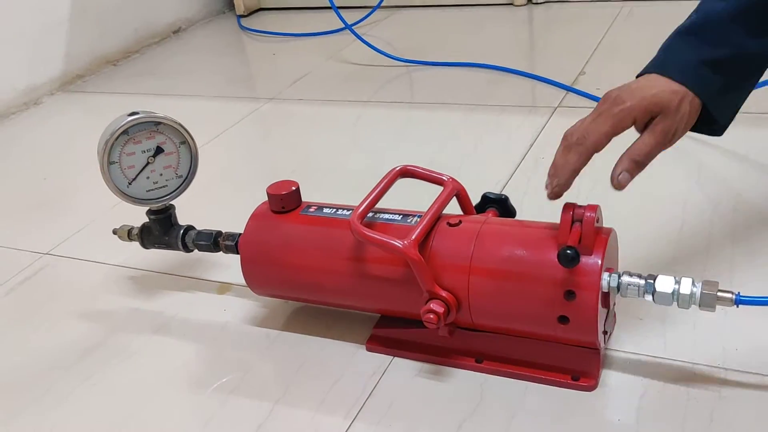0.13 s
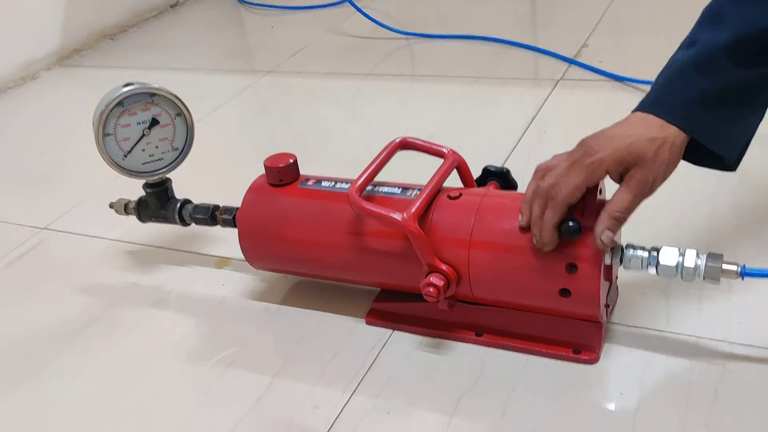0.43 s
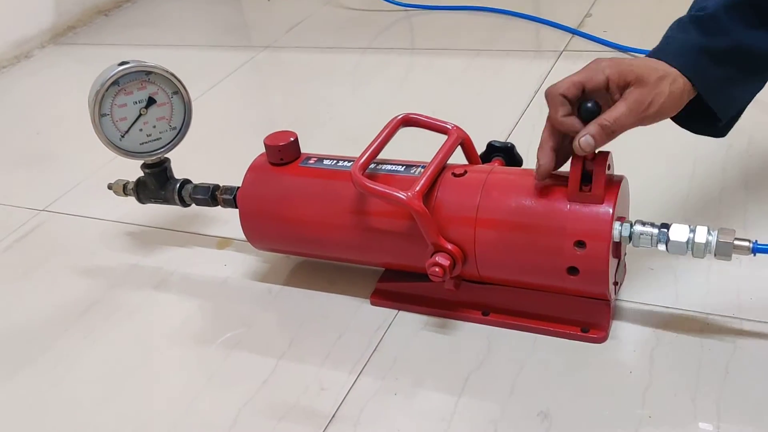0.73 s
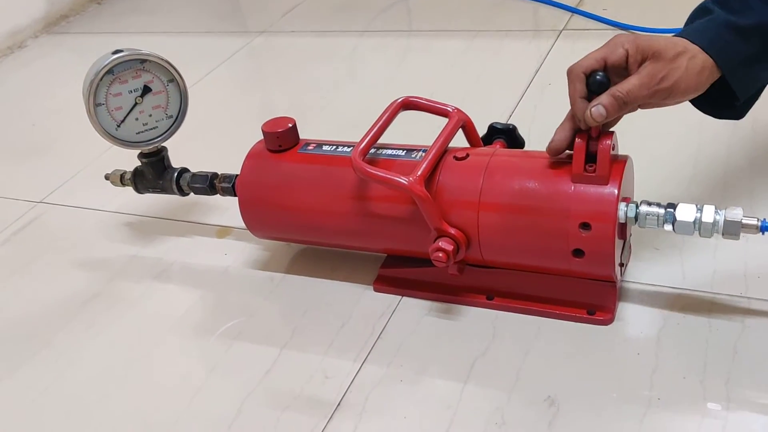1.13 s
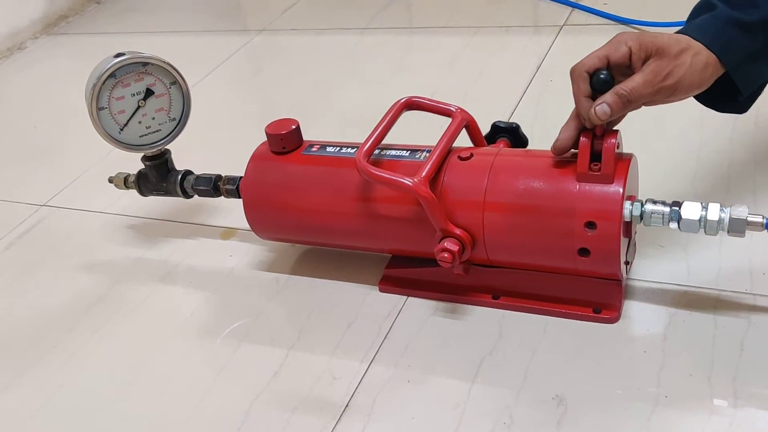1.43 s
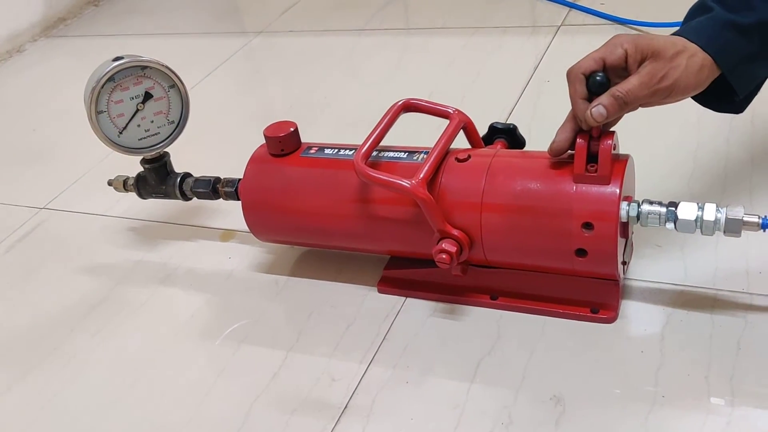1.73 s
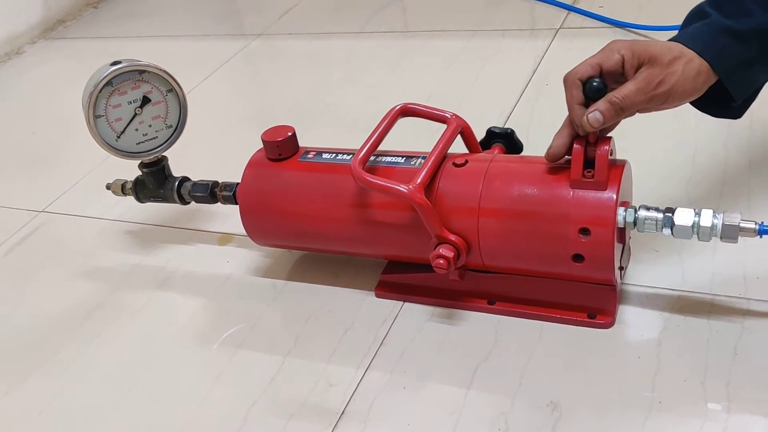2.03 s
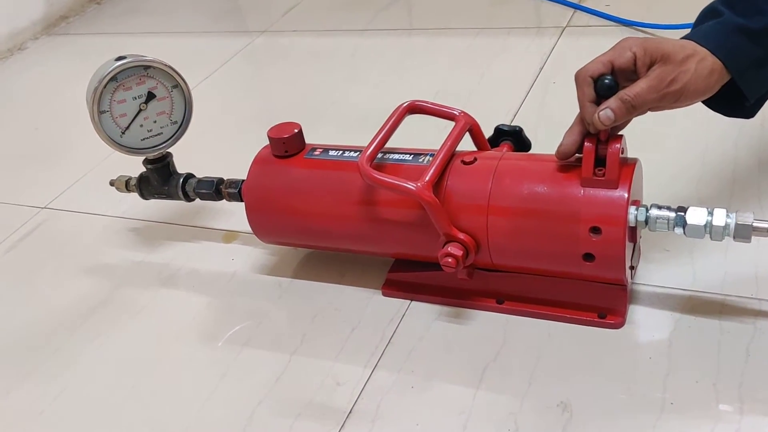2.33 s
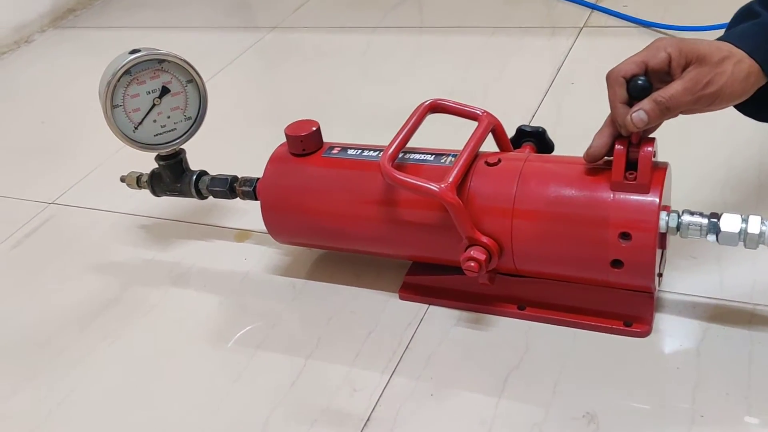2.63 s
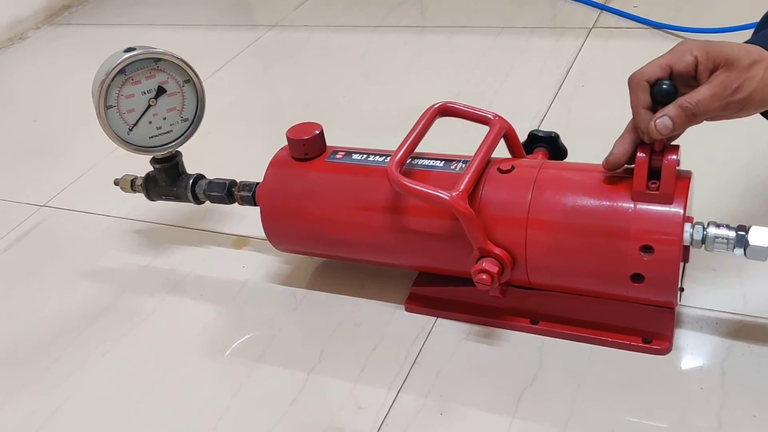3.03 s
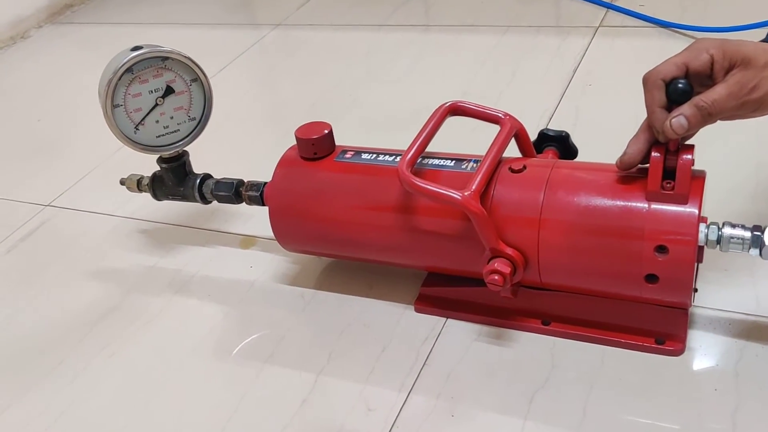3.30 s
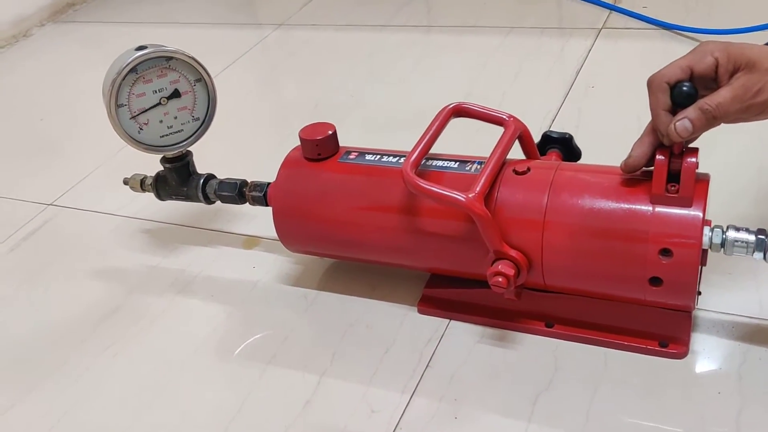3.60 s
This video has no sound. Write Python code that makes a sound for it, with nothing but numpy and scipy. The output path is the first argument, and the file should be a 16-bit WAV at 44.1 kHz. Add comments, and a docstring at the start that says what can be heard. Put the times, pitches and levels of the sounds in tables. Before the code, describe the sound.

After about a second of humming room, air whistles into a pump, which then cycles quickly, each stroke a bright spitting hiss, thump and hollow knock, slowing slightly at the end; close, compressed microphones, hard small room.

```python
"""A workshop hums: shaped room noise, wavering drones and thin sine motor lines, with a brief hiss and a sliding rub.
A hand opens the valve and air whistles in, as noise through pipe resonances. Then an air-driven pump on a tiled floor
cycles six times a second, slowing at the end: each stroke vents gated, fading noise and a thump, then the piston
lands and knocks body resonances; near the end comes one small tick.
Two small microphones, each with its own treble peak and its own limiter, squeeze the bursts."""
import sys
import numpy as np
from scipy import signal
from scipy.fft import rfft, irfft, next_fast_len
from scipy.io import wavfile
from scipy.ndimage import uniform_filter1d, minimum_filter1d

SR = 44100
rng = np.random.default_rng(int(sys.argv[2]) if len(sys.argv) > 2 else 0)


def digitize_waveform(pressure):
    """Quantize a signal to 16-bit integers and store it at the path in sys.argv[1].

    Rows of a 2-D input are taken as channels; values are limited to [-1, 1].
    """
    field = np.atleast_2d(pressure).T
    bounded = np.clip(field, -1, 1)
    quanta = np.round(bounded * 32767).astype(np.int16)
    wavfile.write(sys.argv[1], SR, quanta)


N = 165816
TIME_S = np.arange(N) / SR

# Room tone spectrum: f/Hz, density level/dB
ROOM_SPECTRUM = [(20, 8), (30, -11.5), (60, -18), (90, -18), (110, -7), (170, -6), (250, -12), (500, -14),
                 (1000, -24.5), (2000, -27.5), (4500, -34), (8000, -39), (11000, -46.5), (16000, -56)]
# Broad hums: f/Hz, width/Hz, level/dB
BROAD_HUMS = [(105, 10, -45), (130, 8, -45), (165, 12, -46), (280, 4, -44), (323, 8, -48), (383, 8, -49),
              (533, 8, -51)]
# The main hum note wavers: t/s, f/Hz, level/dB
HUM_NOTE = [(0, 197.7, -35), (.07, 192, -38), (.15, 191.8, -32.5), (.32, 204.4, -30.5), (.5, 199.2, -36),
            (.68, 193.9, -36.5), (.88, 195.6, -32.5), (1.08, 191.3, -36.5), (1.199, 189.7, -48),
            (3.76, 194.4, -42)]
# Steady motor lines: f/Hz, left level/dB, right level/dB
MOTOR_LINES = [(1308, -49, -59), (1548, -60, -59), (1742, -62, -61), (1839, -61, -61), (1937, -56, -54),
               (2034, -58, -58)]
# Loudness of the faint hiss: t/s, level/dB
FAINT_HISS_CURVE = [(0.1, -57), (0.106, -44), (0.154, -56), (0.328, -35), (0.534, -57), (0.6, -65)]
# Spectrum of the faint hiss: f/Hz, density level/dB
FAINT_HISS_SPECTRUM = [(1500, -17), (2600, 6.5), (3600, 3.5), (4500, 3.5), (8000, 3), (13000, -13),
                       (16000, -27)]
# Faint sliding rub: t/s, f/Hz, level/dB
RUB_PATH = [(.19, 3700, -62), (.21, 3650, -44), (.25, 3620, -44), (.28, 3420, -40), (.32, 3400, -44),
            (.35, 3300, -62)]
# Loudness of the air rushing in: t/s, level/dB
INLET_CURVE = [(1.12, -50), (1.131, -31), (1.142, -34), (1.17, -25), (1.24, -22), (1.251, -26), (1.3, -31)]
# Resonances of the inlet pipe: f/Hz, width/Hz, level/dB
PIPE_RESONANCES = [(3900, 560, 2), (4800, 400, -10), (5900, 600, -10), (6830, 500, -8), (9300, 1100, -3.5),
                   (12300, 600, -12)]
# Piston landings: t/s, level/dB
LANDINGS = [(1.293, -20.5), (1.448, -24), (1.606, -22.5), (1.766, -21.5), (1.923, -25.5), (2.085, -24),
            (2.246, -22), (2.406, -21.5), (2.569, -20.5), (2.732, -23.5), (2.897, -21), (3.061, -23),
            (3.234, -24), (3.419, -22.5), (3.633, -24.5)]
# Contacts within each landing: delay/s, level/dB
CONTACTS = [(0, 5), (.009, -1.5), (.021, -16), (.034, -7), (.06, 1), (.073, -0.5), (.086, 0), (.097, -7),
            (.118, -5)]
# Resonances of the pump body: f/Hz, level/dB, t60/s
BODY_MODES = [(139, -7.5, 0.053), (192, -4, 0.047), (300, -6.5, 0.031), (427.4, -6.5, 0.05),
              (536, -1, 0.04), (752, -4, 0.058), (899, -21, 0.069)]
# Exhaust bursts: t/s, level/dB, second puff delay/s, second puff level/dB, jet f/Hz
BURSTS = [(1.2556, 0.5, 0.11, -6, 6150), (1.4108, -2, .1, -9, 6300), (1.5691, -2.5, 0.085, 1, 5500),
          (1.7285, -1, .098, -6, 6450), (1.8864, -3, 0.096, -11, 6130), (2.0474, -4, .098, 0, 6050),
          (2.208, -1.5, .1, -1, 5700), (2.372, -1, 0.11, -8, 6600), (2.5307, -0.5, 0.092, 3, 6200),
          (2.6965, -2.5, 0.094, -2, 6460), (2.8593, -1, 0.098, -1, 6470), (3.0254, -2, 0.076, -5, 6300),
          (3.194, -1.5, 0.091, -7, 6550), (3.3807, -2, 0.077, 4, 6360), (3.5958, 1, 0.089, -6, 7000)]
# How fast a burst dies: f/Hz, fade/(dB/s)
BURST_FADE = [(1000, 32), (3500, 45.5), (7000, 36.5), (14000, 100)]
# Spectrum of the vented air: f/Hz, density level/dB
AIR_SPECTRUM = [(400, -12), (900, -11), (1500, -13), (2300, -5), (3000, 2), (3400, 0), (3850, 2), (4500, 1),
                (6000, 2.5), (8500, -2), (11000, 0.5), (16000, -10)]
# Narrow jet resonances: f/Hz, width/Hz, level/dB
JET_WHISTLES = [(2970, 360, -22), (3750, 180, -19.5), (5570, 121, -16.5), (5800, 110, -23),
                (6730, 110, -15.5), (7000, 140, -23), (7830, 92, -23), (8320, 190, -16), (8640, 270, -20.5)]
# Left-right likeness of wide noise: f/Hz, correlation (-1 to 1)
STEREO_LIKENESS = [(60, 0.78), (130, 1), (290, 0.81), (640, 0.36), (1410, -0.28), (3100, 0.084),
                   (6820, -0.18), (15000, -0.026)]
# Microphone colour: f/Hz, left level/dB, right level/dB
MIC_COLOUR = [(4700, -2.5, -1.5), (5370, 0.5, 0.5), (5900, 4.5, 0), (7300, 2.5, 2), (7380, -12, 8.5),
              (8730, -4, 10), (10600, -12.5, 2), (11900, -9, 4.5), (13500, -6, 2), (15500, -3, 2.5)]

ROOM_TONE_DB, ROOM_PATCHY_DB = -30.5, -1.5
RUB_WIDTH_HZ = 70
VALVE_S, VALVE_OPEN_S, INLET_BED_DB = 1.125, .005, -5

CHATTER_JITTER_S, CHATTER_SPREAD_DB = .0015, 2.5
CHAMBER_HZ, SAG_HZ_PER_S, CHAMBER_T60_S, CHAMBER_DB = 915, 850, .05, 2.5
RUSH_DB, STOPS_EARLY_S = -31, 0.044   # air noise on the travelling piston, which rests before the next landing
CASING_CUT_HZ = 1050   # the casing holds back the top of the knocks
TICK_S, TICK_DB, TICK_HZ, TICK_T60_S = 3.597, -14, 1400, 0.012
KNOCK_GAIN_DB, KNOCK_RIGHT_DB = 3, -8   # the right offset is added to the gain
ROOM_DB, ROOM_T60_S, ROOM_FROM_HZ = -6, .3, 200   # below this the walls add no spread

# the valve opens; just before, the old stream dips, deepening the limiter's early cut
ATTACK_S, DIP_S, DIP_DB = .004, .005, -12
POP_S, POP_LEFT_DB, POP_RIGHT_DB = 0.013, 8, 3
RIGHT_FADE_DB_PER_S = -10   # added to the fade: the right side dies more slowly
PUFF_RISE_S, PUFF_DIE_S, PUFF_RIGHT_DB = 0.008, 0.053, -29.5
JET_WIDTH_HZ, JET_SAG_HZ_PER_S, JET_DB = 400, 600, -13
WHISTLE_WANDER_DB, WHISTLE_SHIFT = 5, .03   # level spread; share by which each burst detunes them
FLUTTER_DB = 1.38   # spread of each of the two flutters
ECHO_DB, ECHO_T60_S = -11, .08   # tiles and near walls
EXHAUST_GAIN_DB, EXHAUST_RIGHT_DB = -7, 1.5   # the right offset is added to the gain
THUMP_DB, THUMP_HZ, THUMP_T60_S = -2, 109, 0.0076

LIMIT_LEFT_DB, LIMIT_RIGHT_DB, RELEASE_DB_PER_S = -19.5, -19, 172
SQUEEZE = .55   # share of the overshoot taken away
LOOK_S, SENSE_S = .007, .004
STOP_HZ = 16200   # the top is at least 70 dB down from here


def amp(db):
    """Turn decibels into gain."""
    return 10 ** (np.asarray(db) / 20)


def unit(x):
    """Bring a sound to rms 1."""
    return x / np.sqrt(np.mean(np.square(x)) + 1e-20)


def sides(left, right):
    """Stack a left and a right setting so they spread over a stereo sound."""
    return np.array([[left], [right]])


def at_hz(table, hz, column=1):
    """Read a table on a log-frequency axis."""
    rows = np.array(table)
    return np.interp(np.log(np.maximum(hz, 1)), np.log(rows[:, 0]), rows[:, column])


def level(rows):
    """Gain along a decibel curve, practically silent outside it."""
    t, db = np.transpose(rows)
    return amp(np.interp(TIME_S, t, db, left=-120, right=-120))


def drift(rate_hz):
    """Slow random motion with spread 1: noise through two equal low-pass poles at a fortieth of the sample rate."""
    r = np.exp(-80 * np.pi * rate_hz / SR)
    settling = 2000
    noise = rng.standard_normal(N // 40 + 2 + settling)
    slow = signal.lfilter([1], [1, -2 * r, r * r], noise)[settling:]
    return np.interp(np.arange(N) / 40, np.arange(len(slow)), unit(slow))


def noise_bands(spectrum, low_hz, count):
    """Stereo noise cut into overlapping half-octave bands that sum to rms 1: (centre Hz, sound)."""
    hz = np.fft.rfftfreq(N, 1 / SR)
    mid, side = rfft(rng.standard_normal((2, N)))
    alike = np.clip(at_hz(STEREO_LIKENESS, hz), -1, 1)
    stereo = np.sqrt(1 + alike) * mid + np.sqrt(1 - alike) * side * sides(1, -1)
    stereo = amp(at_hz(spectrum, hz)) * (hz > low_hz) * stereo
    stereo = stereo / np.sqrt(np.mean(irfft(stereo, N) ** 2))
    place = np.clip(2 * np.log2(np.maximum(hz, 1) / low_hz), 0, count - 1)
    bands = []
    for k in range(count):
        share = np.clip(1 - abs(place - k), 0, 1)
        bands.append((low_hz * 2 ** (k / 2), irfft(stereo * share, N)))
    return bands


def narrow(hz, width_hz, order=1):
    """Noise through a resonance, once or more, rms 1."""
    r, x = np.exp(-np.pi * width_hz / SR), rng.standard_normal(N)
    for _ in range(order):
        x = signal.lfilter([1, 0, -1], [1, -2 * r * np.cos(2 * np.pi * hz / SR), r * r], x)
    return unit(x)


def ring(drive, hz, t60):
    """Clicks or noise set a decaying sine ringing."""
    r, w = amp(-60 / (t60 * SR)), 2 * np.pi * hz / SR
    return signal.lfilter([0, np.sin(w)], [1, -2 * r * np.cos(w), r * r], drive + 1e-18)


def gliding(drive, hz, width_hz):
    """A resonance whose centre moves: the drive is shifted down, low-passed and shifted back."""
    turn = np.exp(2j * np.pi * np.cumsum(hz) / SR)
    r = np.exp(-np.pi * width_hz / SR)
    return np.real(turn * signal.lfilter([1], [1, -r], drive / turn + 1e-18))


def gliding_noise(hz, width_hz):
    """Independent left and right noise through one moving resonance, rms 1."""
    return unit([gliding(noise, hz, width_hz) for noise in rng.standard_normal((2, N))])


def echoes(x, t60):
    """Dense reflections: each side convolved with its own dying noise of unit energy."""
    length = SR // 2
    tail = rng.standard_normal((2, length)) * amp(-60 * np.arange(length) / SR / t60)
    tail = tail / np.sqrt(np.sum(tail ** 2, axis=1, keepdims=True))
    return signal.fftconvolve(np.atleast_2d(x), tail, axes=1)[:, :N]


def workshop():
    """Patchy room noise, resonant and sine hums that waver, steady motor lines and one faint hiss."""
    tone = sum(amp(ROOM_PATCHY_DB * drift(0.67)) * band
               for hz, band in noise_bands(ROOM_SPECTRUM, 23.6, count=20))
    drones = sum(amp(db) * narrow(hz, width) for hz, width, db in BROAD_HUMS)

    t, hum_hz, hum_db = np.transpose(HUM_NOTE)
    hum_phase = 2 * np.pi * np.cumsum(np.interp(TIME_S, t, hum_hz)) / SR
    hum_gain = amp(np.interp(TIME_S, t, hum_db) + 1.04 * drift(6.3))
    hum = np.sqrt(2) * hum_gain * np.sin(hum_phase)

    lines = 0
    for hz, left_db, right_db in MOTOR_LINES:
        sine = np.sin(2 * np.pi * (hz * TIME_S + rng.random()))
        lines = lines + np.sqrt(2) * amp(sides(left_db, right_db)) * sine

    hiss = sum(band for hz, band in noise_bands(FAINT_HISS_SPECTRUM, 1200, count=2))
    return amp(ROOM_TONE_DB) * tone + drones + hum + lines + level(FAINT_HISS_CURVE) * hiss


def scrape():
    """A faint narrow rub: noise in a resonance that slides down in pitch."""
    t, hz, db = np.transpose(RUB_PATH)
    pitch = np.interp(TIME_S, t, hz)
    return level(np.transpose([t, db])) * gliding_noise(pitch, RUB_WIDTH_HZ)


def inlet():
    """Air through the opened valve sings in the resonances of the pipe."""
    pipe = np.array([sum(amp(db) * narrow(hz, width, order=2) for hz, width, db in PIPE_RESONANCES)
                     for side in range(2)])
    bed = sum(band for hz, band in noise_bands(AIR_SPECTRUM, 800, count=2))
    valve = np.clip((TIME_S - VALVE_S) / VALVE_OPEN_S, 0, 1)
    return valve * level(INLET_CURVE) * unit(pipe + amp(INLET_BED_DB) * bed)


def piston():
    """Every landing and its chatter strike the body and the air chamber, heard direct and off the walls."""
    delay, contact_db = np.transpose(CONTACTS)
    land_s, land_db = np.transpose(LANDINGS)
    jitter = CHATTER_JITTER_S * rng.standard_normal((len(land_s), len(delay))) * (delay > 0)
    when = land_s[:, None] + delay + jitter

    def contacts(mode_db):
        """One click per contact, with a fresh spread of levels for each resonance."""
        clicks = np.zeros(N + SR)
        spread = CHATTER_SPREAD_DB * rng.standard_normal(when.shape)
        clicks[(when * SR).astype(int)] = amp(land_db[:, None] + contact_db + mode_db + spread)
        return clicks[:N]

    k = np.maximum(np.searchsorted(land_s, TIME_S) - 1, 0)   # the latest landing
    age = TIME_S - land_s[k]
    travel = np.diff(land_s, append=N / SR)[k] - STOPS_EARLY_S
    moving = (age > 0) * (age < travel)
    rush = amp(land_db[k] + RUSH_DB) * moving * rng.standard_normal((2, N))

    body = sum(ring(contacts(db) + amp(db) * rush[0], hz, t60) for hz, db, t60 in BODY_MODES)
    # the chamber grows as the piston travels, so its pitch sags
    chamber_hz = CHAMBER_HZ - SAG_HZ_PER_S * np.clip(age, 0, travel)
    chamber_width = np.log(1000) / np.pi / CHAMBER_T60_S
    chamber = gliding(contacts(CHAMBER_DB) + amp(CHAMBER_DB) * rush, chamber_hz, chamber_width)
    casing = signal.butter(3, CASING_CUT_HZ, fs=SR, output="sos")
    direct = signal.sosfilt(casing, body + chamber)

    tick_click = amp(TICK_DB) * (np.arange(N) == int(TICK_S * SR))
    direct = direct + ring(tick_click, TICK_HZ, TICK_T60_S)
    high_pass = signal.butter(2, ROOM_FROM_HZ, "high", fs=SR, output="sos")
    wet = echoes(signal.sosfilt(high_pass, direct), ROOM_T60_S)
    return amp(KNOCK_GAIN_DB + sides(0, KNOCK_RIGHT_DB)) * (direct + amp(ROOM_DB) * wet)


def exhaust():
    """Each burst opens with a pop, fades fastest at the very top, puffs once more, and pushes out a low thump."""
    burst_s, burst_db, puff_s, puff_db, jet_hz = np.transpose(BURSTS)
    k = np.maximum(np.searchsorted(burst_s - ATTACK_S, TIME_S) - 1, 0)   # the latest burst
    age = np.maximum(TIME_S - burst_s[k] + ATTACK_S, 0)
    opening = np.minimum(age / ATTACK_S, 1) ** 2
    pop_db = sides(POP_LEFT_DB, POP_RIGHT_DB) * np.exp(-np.maximum(age - ATTACK_S, 0) / POP_S)

    puff_rise = np.clip((age - puff_s[k]) / PUFF_RISE_S, 0, 1)
    puff_fall = np.exp((puff_s[k] - age) / PUFF_DIE_S)
    puff = amp(puff_db[k] + sides(0, PUFF_RIGHT_DB)) * puff_rise * puff_fall

    until_next = np.append(burst_s[1:], np.inf)[k] - ATTACK_S - TIME_S
    dip = amp(DIP_DB * np.clip(1 - until_next / DIP_S, 0, 1))
    old_age = np.append(1, np.diff(burst_s))[k] + age   # the last burst still fades under the opening

    jet_pitch = jet_hz[k] - JET_SAG_HZ_PER_S * age
    voices = [(jet_hz.mean(), amp(JET_DB) * gliding_noise(jet_pitch, JET_WIDTH_HZ))]
    for hz, width, db in JET_WHISTLES:
        wander = amp(db + WHISTLE_WANDER_DB * drift(8.3))
        detune = 1 + WHISTLE_SHIFT * rng.standard_normal(len(burst_s))[k]
        voices.append((hz, wander * gliding_noise(hz * detune, width)))

    air, together = 0, drift(26.0)   # all bands share one flutter and add their own
    for hz, band in noise_bands(AIR_SPECTRUM, 394, count=12) + voices:
        fade = at_hz(BURST_FADE, hz) + sides(0, RIGHT_FADE_DB_PER_S)
        fresh = opening * amp(burst_db[k] + pop_db - fade * age)
        old = (1 - opening) * amp(burst_db[k] + DIP_DB - fade * old_age) * (k > 0)
        flutter = amp(FLUTTER_DB * (together + drift(13.3)))
        air = air + (fresh + old + puff * (age > 0)) * dip * flutter * band
    air = air + amp(ECHO_DB) * echoes(air, ECHO_T60_S)

    clicks = np.zeros(N)
    clicks[(burst_s * SR).astype(int)] = amp(burst_db + THUMP_DB)
    thump = ring(clicks, THUMP_HZ, THUMP_T60_S)
    return amp(EXHAUST_GAIN_DB + sides(0, EXHAUST_RIGHT_DB)) * air + thump


def scene():
    """Lay the humming workshop under the rub, the inlet air, the piston and the exhaust."""
    return workshop() + scrape() + inlet() + piston() + exhaust()


def record(dry):
    """Microphone colour, then a look-ahead limiter and soft clipping on each side, then the top is cut."""
    size = next_fast_len(N + SR // 10)
    hz = np.fft.rfftfreq(size, 1 / SR)
    colour = amp([at_hz(MIC_COLOUR, hz, column=1), at_hz(MIC_COLOUR, hz, column=2)])
    x = irfft(rfft(dry, size) * colour, size)[:, :N]

    power = uniform_filter1d(x ** 2, int(SENSE_S * SR))
    loud_db = 10 * np.log10(power + 1e-12)
    cut_db = SQUEEZE * np.maximum(loud_db - sides(LIMIT_LEFT_DB, LIMIT_RIGHT_DB), 0)
    # each cut lets go at a steady rate unless a stronger one takes over
    ramp = RELEASE_DB_PER_S * TIME_S
    cut_db = np.maximum.accumulate(cut_db + ramp, axis=1) - ramp
    # hold the strongest nearby cut, then smooth it, so the gain moves ahead of the peak
    look = int(LOOK_S * SR)
    cut_db = uniform_filter1d(-minimum_filter1d(-cut_db, look), look)
    limited = np.tanh(x * amp(-cut_db))
    return signal.sosfilt(signal.cheby2(14, 70, STOP_HZ, fs=SR, output="sos"), limited)


dry = scene()
out = record(dry)
digitize_waveform(out)
```